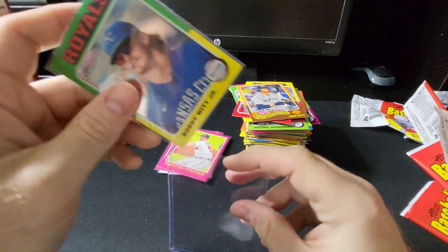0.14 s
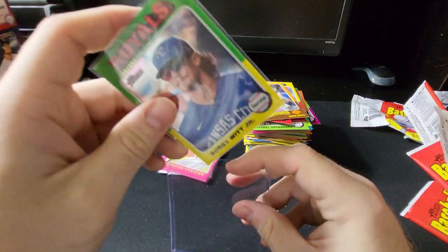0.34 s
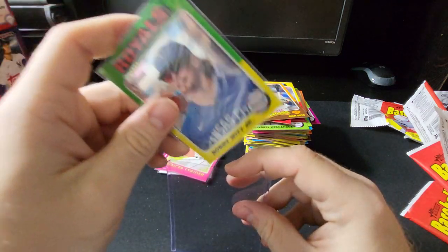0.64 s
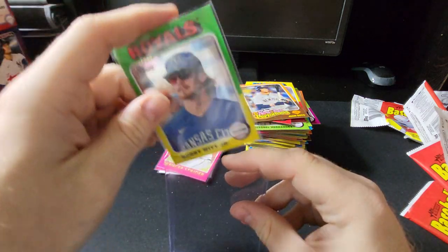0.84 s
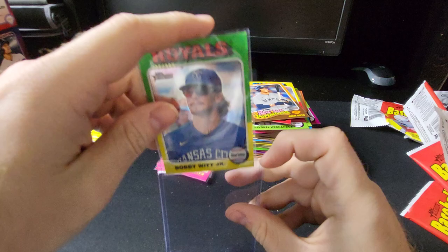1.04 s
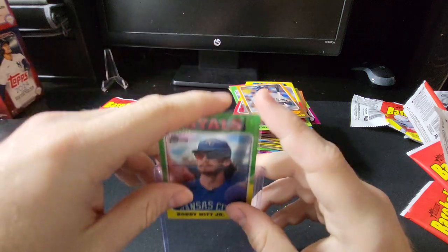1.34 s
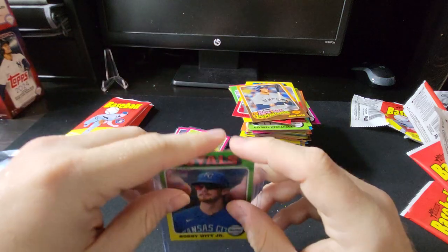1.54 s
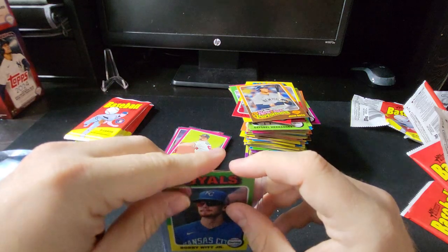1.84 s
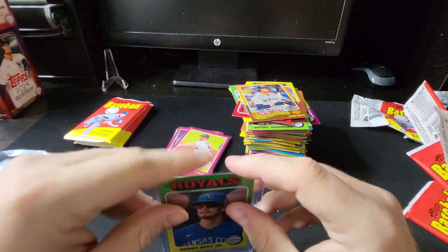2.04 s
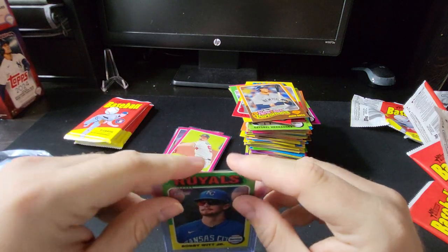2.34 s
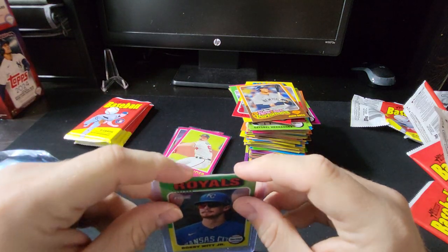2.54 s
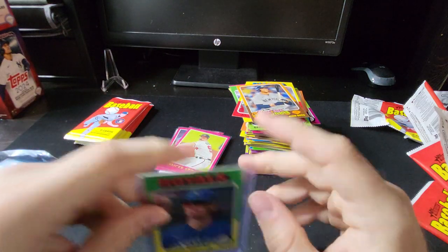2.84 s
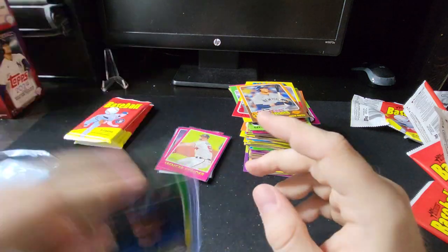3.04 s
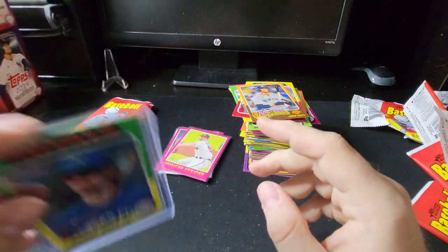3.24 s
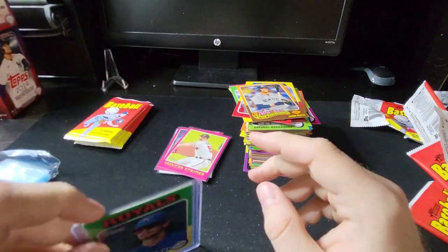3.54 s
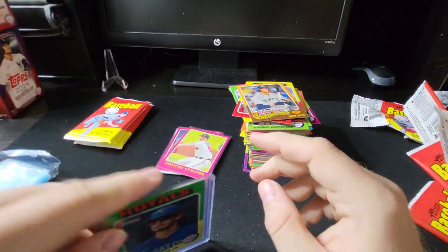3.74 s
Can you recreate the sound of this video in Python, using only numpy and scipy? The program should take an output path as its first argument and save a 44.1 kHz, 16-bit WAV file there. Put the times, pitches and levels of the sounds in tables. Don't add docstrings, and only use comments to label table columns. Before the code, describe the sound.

A card is pushed into a stiff plastic sleeve with soft scraping and crisp ticks, wrists thump the desk dully, then the sleeve edge raps twice on wood; quiet room, very close stereo microphone.

```python
import sys
import numpy as np
from scipy import signal
from scipy.io import wavfile
from scipy.ndimage import uniform_filter1d

SR = 44100
rng = np.random.default_rng(int(sys.argv[2]) if len(sys.argv) > 2 else 0)


def volts_from_db(level):
    exponent = np.asarray(level, float) / 20
    return 10 ** exponent


def int16_out(signal):
    q = np.round(np.clip(np.atleast_2d(signal).T, -1, 1) * 32767)
    wavfile.write(sys.argv[1], SR, q.astype(np.int16))


N = 171990
RUB_SAME, RUB_PAN_DB = 0.25, 3.5


def evened(x):
    return x / np.sqrt(np.mean(x ** 2) + 1e-20)


def read(points, hz):
    f, value = np.transpose(points)
    return np.interp(np.log(hz + 1), np.log(f + 1), value)


def add(mix, s, sound):
    part = mix[..., max(round(s * SR), 0):][..., :sound.shape[-1]]
    part += sound[..., :part.shape[-1]]


def high(x, hz, order):
    return signal.sosfilt(signal.butter(order, np.clip(hz, 20, SR / 3), "high", fs=SR, output="sos"), x)


def resonate(x, hz, width):
    turn = np.exp(2j * np.pi * np.cumsum(hz * np.ones(x.shape[-1])) / SR)
    r = np.exp(-np.pi * width / SR)
    return 2 * (turn * signal.lfilter([1 - r], [1, -r], x / turn)).real


def resonate_twice(x, hz, width):
    return resonate(resonate(x, hz, width), hz, width)


def pair(a, b, same, pan_db):
    right = same * a + np.sqrt(1 - same ** 2) * b
    return np.array([a * volts_from_db(pan_db / 2), right * volts_from_db(-pan_db / 2)])


def plastic(x, hz, width, wide_db, low_hz):
    wide = high(x, low_hz if hz > 1.5 * low_hz else hz / 4, order=6)
    return evened(evened(resonate_twice(wide, hz, width)) + volts_from_db(wide_db) * evened(wide))


def patchy(x, db):
    z = signal.stft(x, nperseg=256)[2]
    field = uniform_filter1d(rng.standard_normal(z.shape[1:]), size=7, axis=0)
    field = uniform_filter1d(field, size=12, axis=1)
    return signal.istft(z * volts_from_db(db * evened(field)), nperseg=256)[1][:, :N]


# time in seconds, level in dB, brightest pitch in Hz, wide hiss in dB.
SLIDE_PATH = [
    (1.0, -65.5, 6130, 6),
    (1.116, -56.5, 10900, 6),
    (1.19, -42, 11600, -0.5),
    (1.392, -35.5, 7660, -16),
    (1.61, -44, 8500, -2.5),
    (1.662, -49.5, 5900, 8.5),
    (1.724, -56.5, 7260, 5),
    (1.788, -44.5, 6170, 5.5),
    (1.83, -81, 5500, 2),
]


def slide(slips):
    s, db, hz, wide_db = np.transpose(SLIDE_PATH)
    t = np.arange(N) / SR
    wide = high(slips, 3000, order=4)
    peak = evened(resonate_twice(wide, np.interp(t, s, hz), width=4370))
    hiss = 0.53 * (peak + volts_from_db(np.interp(t, s, wide_db)) * evened(wide))
    return volts_from_db(np.interp(t, s, db, -120, -120)) * pair(*hiss, RUB_SAME, RUB_PAN_DB)


# start in seconds, length in seconds, level in dB, brightest pitch in Hz, left-right balance in dB.
RUB_STROKES = [(0, 0.34, -70.5, 5400, -9), (.5, 0.16, -71.5, 3500, 4), (.765, 0.22, -62.5, 1490, 9),
               (.765, 0.19, -57.5, 7300, 1.5), (.9, 0.11, -47, 10100, 9), (.946, 0.0088, -32, 12700, 19),
               (.977, 0.011, -43, 3520, 6), (.93, 0.061, -52.5, 2020, 10), (1.62, 0.2, -61, 1480, -4),
               (1.77, 0.038, -58.5, 1770, 6), (1.51, 0.068, -46, 12900, 8), (1.74, 0.062, -56.5, 13500, 6),
               (1.953, 0.033, -40, 4430, 5), (1.953, 0.022, -45, 13000, -5.5),
               (2.01, 0.0079, -44.5, 7500, -29), (2.1, 0.19, -65, 6600, 0), (2.38, 0.13, -62, 1850, 7.5),
               (2.53, 0.11, -64, 5400, 4), (2.8, 0.1, -55, 2390, 3), (2.885, 0.039, -52.5, 6500, -1),
               (3.19, 0.12, -49, 8500, -1), (3.45, 0.2, -54.5, 5900, 1.5), (3.58, 0.32, -59, 4130, 4),
               (3.82, 0.42, -50.5, 5640, 4), (2.44, 0.078, -57.5, 7060, 1), (2.56, 0.08, -64, 2600, 5),
               (2.65, 0.058, -70, 903, -1.5), (3.092, 0.032, -60, 6060, 8), (3.365, 0.065, -62, 7200, 2),
               (3.24, .05, -45.5, 13200, 4), (3.52, .06, -55, 14000, 2), (3.49, 0.032, -54, 3500, -3),
               (2.475, 0.029, -58, 8040, 2)]


def rubbing():
    slips_per_s, grain_db, flutter_db = 8200, 0, 1.2
    rise, fall = 0.14, 0.46
    out = np.zeros((2, N))
    draw, size = rng.random((2, N)), rng.exponential(1, (2, N))
    sign, flutter = rng.standard_normal((2, N)), rng.standard_normal(N)
    slips = (draw < slips_per_s / SR) * volts_from_db(grain_db * np.minimum(size, 5)) * sign
    slips *= volts_from_db(flutter_db * evened(uniform_filter1d(flutter, size=500)))
    for k, (s, length, db, hz, pan_db) in enumerate(RUB_STROKES):
        u = np.arange(0, length, 1 / SR) / length
        ramp = np.clip(np.minimum(u / rise, (1 - u) / fall), 0, 1)
        shape = np.sin(np.pi / 2 * ramp) ** 2
        at = (np.arange(len(u)) + k * 7001) % N
        rub = plastic(slips[:, at], hz, min(6600, 1.34 * hz), wide_db=-6, low_hz=3430)
        add(out, s, volts_from_db(db) * shape * pair(*rub, RUB_SAME, pan_db))
    return patchy(out + slide(slips[:, ::-1]), 2.3)


# time in seconds, peak level in dB, pitch in Hz, length in seconds.
PLASTIC_TICKS = [(0.769, -34.5, 6960, 0.0039), (0.501, -51, 1200, 0.024), (0.946, -11, 11900, 0.004),
                 (0.9451, -19.5, 3000, 0.0051), (0.953, -17, 12500, 0.0044), (0.981, -27, 1060, 0.0077),
                 (0.956, -34, 11000, .002), (0.9569, -21, 13600, 0.011), (0.965, -29, 4970, 0.0041),
                 (0.959, -24, 13000, .004), (0.98, -19, 4500, 0.0056), (.8875, -44, 7430, 0.0032),
                 (0.912, -38, 7900, .004), (1.186, -42, 4330, .006), (1.233, -31.5, 4400, 0.0035),
                 (1.666, -15, 5330, 0.006), (1.9567, -8.5, 3100, 0.0011), (1.9714, -25, 2100, 0.0042),
                 (1.9716, -16.5, 7700, 0.0029), (1.9877, -26, 1160, 0.0046), (1.988, -28, 5030, .003),
                 (2.0108, -16.5, 7600, 0.0025), (2.0104, -16, 14500, 0.0034), (2.0144, -40, 7600, 0.0014),
                 (2.0164, -38, 7600, 0.0026), (2.465, -37.5, 1290, 0.0043), (2.563, -45, 7090, .004),
                 (2.82, -47, 2230, .004), (1.082, -44, 4300, 0.0041), (2.0963, -32, 6300, 0.005),
                 (2.1012, -26.5, 11640, 0.0031), (2.153, -36, 6900, 0.0078), (2.462, -38, 7200, 0.0044),
                 (2.536, -37, 8060, 0.0047), (2.881, -22, 7200, 0.0081), (2.994, -47, 10900, .003),
                 (3.038, -32, 9300, 0.0025), (3.093, -44.5, 5700, .004), (3.105, -42.5, 7100, 0.0036),
                 (3.1535, -9.5, 6000, 0.0018), (3.157, -3.5, 3360, 0.0029), (3.185, -16.5, 5800, 0.0024),
                 (3.4281, -10.5, 3720, 0.0043), (3.432, 0.5, 2000, 0.0017), (3.6506, -34, 4530, 0.0052)]


def ticks():
    rise_s, spike_db = 0.0007, 7
    out, t = np.zeros((2, N)), np.arange(1500) / SR
    noise = rng.standard_normal((len(PLASTIC_TICKS), 2, len(t)))
    noise[:, :, 24] = volts_from_db(spike_db) * 2
    for (s, db, hz, length), z in zip(PLASTIC_TICKS, noise):
        snap = plastic(z, hz, min(4900, 1.22 * hz), wide_db=-7.5, low_hz=hz / 8)
        snap = snap * np.minimum(t / rise_s, 1) ** 2 * np.exp(-2 * t / length)
        add(out, s, volts_from_db(db) / 2 * pair(*snap, same=0.14, pan_db=3.5))
    return out


# time in seconds, pitch in Hz, level in dB.
MOUTH_AIR = [
    (1.099, 450, -81),
    (1.33, 530, -63.5),
    (1.52, 650, -66),
    (1.62, 640, -62.5),
    (1.78, 996, -57),
    (1.831, 956, -73),
]


def mouth():
    s, hz, db = np.transpose(MOUTH_AIR)
    t = np.arange(N) / SR
    a, b = evened(resonate_twice(rng.standard_normal((2, N)), np.interp(t, s, hz), width=260))
    return volts_from_db(np.interp(t, s, db, -120, -120)) * pair(a, b, same=1.0, pan_db=4.9)


# time in seconds, strength in dB, contact time in seconds, place from 0 to 1.
DESK_BLOWS = [(0.941, -36.5, 0.0014, 0.54), (0.982, -37.5, 0.0017, 0.4), (1.226, -35, 0.0095, 0.95),
              (1.608, -26.5, 0.0041, 0.64), (1.633, -17.5, 0.0084, 0.53), (1.667, -23, 0.0033, 0.63),
              (1.78, -45.5, 0.00064, 0.5), (1.955, -59.5, 0.00021, 0.74), (1.985, -54.5, 0.0003, 0.8),
              (2.1037, -23, 0.0032, 0.56), (2.4612, -50.5, 0.00061, 0), (2.686, -54.5, 0.0011, 0),
              (2.879, -35, 0.0051, 0.3), (3.1546, -6, 0.00047, 0.04), (3.4269, -5, 0.00099, 0.17),
              (3.1616, -17.5, 0.00043, 0.2), (3.431, -17, 0.00097, 0.4), (.01, -48.5, 0.0016, 0.76)]
# pitch in Hz, level in dB struck at place 0, level in dB at place 1, 60 dB decay in seconds.
DESK_MODES = [(70.1, -7, -15.5, 0.38), (110.6, -2, -8, 0.29), (137, -7, -4.5, 0.33),
              (205.8, -11, -6.5, 0.12), (294, -13, 2, 0.23), (343, -24.5, -34.5, 0.3),
              (437.7, 0.5, -5, 0.081), (533.2, 6, -15, 0.069), (662, -27, -42, .17), (762, -8.5, -15, 0.12),
              (857, -3.5, -22, 0.13), (1041, -2.5, 6.5, 0.079), (1200, -4.5, -34.5, 0.14),
              (1460, -26.5, -21.5, .16)]


def desk():
    spread, swell_cycles, lag_rad = 0.021, 0.33, 2.8
    body_hz, body_db, body_t60 = 570, -4.5, 0.26
    sway_hz, sway_db, sway_t60 = 60, 5, 0.2
    out, t = np.zeros((2, N)), np.arange(SR // 2) / SR
    hz, near_db, far_db, t60 = np.array(DESK_MODES).T[:, :, None]
    jitter = 0.44 * rng.uniform(-1.1, 1, (3, 2, len(DESK_MODES), 1))
    detune = 1 + spread * (np.arange(-1, 2)[:, None, None, None] + jitter)
    lag = lag_rad * np.arange(len(DESK_MODES))[:, None]
    ring = np.sin(2 * np.pi * hz * detune * t - lag).mean(0)
    ring = ring * volts_from_db(-60 * t / t60) * (1 - np.exp(-t * hz / swell_cycles))
    sway = volts_from_db(sway_db - 60 * t / sway_t60) * np.sin(2 * np.pi * sway_hz * t)
    noise = rng.standard_normal((len(DESK_BLOWS), 2, len(t)))
    for (s, db, contact, place), z in zip(DESK_BLOWS, noise):
        modes = (volts_from_db(near_db + (far_db - near_db) * place) * ring).sum(1)
        modes = modes + (100 * contact) ** 2 * sway
        body = pair(*evened(resonate(z, body_hz, body_hz)), same=0.64, pan_db=0)
        body = body * volts_from_db(body_db - 60 * t / body_t60)
        u = t[:2000] / (contact / 4)
        push = u * np.exp(-u)
        add(out, s, volts_from_db(db) * signal.oaconvolve(modes + body, push[None] / push.sum(), axes=1))
    return out


# frequency in Hz, 60 dB decay in seconds.
WALL_DECAY = [(100, 0.41), (800, 0.22), (3000, 0.27), (12000, 0.14)]


def walls(x):
    taps = np.zeros((2, SR // 2))
    slots = np.arange(200, SR // 2 - 20, 20)
    at = slots + rng.integers(0, 20, (2, len(slots)))
    np.put_along_axis(taps, at, rng.choice([-1., 1.], at.shape), 1)
    hz, t, z = signal.stft(taps, SR, nperseg=256)
    tail = signal.istft(z * volts_from_db(-60 * t / read(WALL_DECAY, hz)[:, None]), SR, nperseg=256)[1]
    return signal.fftconvolve(x.mean(0)[None], tail / np.linalg.norm(tail[0]), axes=1)[:, :N]


# frequency in Hz, level in dB per Hz.
ROOM_AIR = [(15, -43), (25, 5), (80, -6.5), (166, -18), (309, -21.5), (962, -39), (1040, -34.5),
            (6210, -46), (16000, -47)]
# frequency in Hz, left-right likeness from 0 to 1.
AIR_SAME = [(60, 0.93), (240, 0.85), (950, 0.23), (3800, 0.23), (15000, 0.8)]


def room():
    air_db, rumble_db = -54, -53
    frames, hz = N // 512 + 5, np.fft.rfftfreq(2048, 1 / SR)
    a, b, c, d, patches = rng.standard_normal((frames, 1025, 5)).T
    patches = uniform_filter1d(uniform_filter1d(patches, size=60, axis=0), size=8, axis=1)
    z = pair(a + 1j * b, c + 1j * d, read(AIR_SAME, hz)[:, None], pan_db=0.4)
    z = z * volts_from_db(read(ROOM_AIR, hz)[:, None] + 0.5 * evened(patches))
    air = evened(signal.istft(z, nperseg=2048, noverlap=1536)[1][:, :N])
    rumble = evened(resonate_twice(rng.standard_normal(N), 67.7, width=15))
    return volts_from_db(air_db) * air + volts_from_db(rumble_db) * rumble


def scene():
    sleeve, wood = rubbing() + ticks() + mouth(), desk()
    echoes = walls(volts_from_db(-14.5) * wood + volts_from_db(-9) * sleeve)
    return sleeve + wood + echoes + room()


def band_limit(x):
    return signal.sosfilt(signal.butter(12, 16970, fs=SR, output="sos"), x)


def record(dry):
    left_db, right_late, ceiling = 3, 8, 1.02
    mid, side = dry.mean(0), high((dry[0] - dry[1]) / 2, 272, order=2)
    left = (mid + side) * volts_from_db(left_db / 2)
    right = np.roll(mid - side, right_late) / volts_from_db(left_db / 2)
    right = right + 0.9 * signal.filtfilt(*signal.butter(2, 11000, "high", fs=SR), right)
    x = high(np.array([left, right]), 32, order=1)
    x = x + volts_from_db(-1.5) * resonate(x, 7700, width=1330) - 0.55 * resonate(x, 8870, width=2840)
    x = ceiling * np.tanh(x / ceiling)
    edge, end = (signal.firwin(401, hz, window=("kaiser", 8), fs=SR) for hz in (15850, 16800))
    x = signal.oaconvolve(x, (edge + volts_from_db(-30) * (end - edge))[None], "same")
    return band_limit(x)


dry = scene()
out = record(dry)
int16_out(out)
```